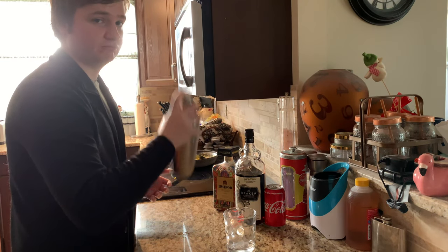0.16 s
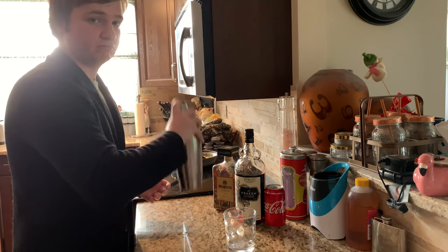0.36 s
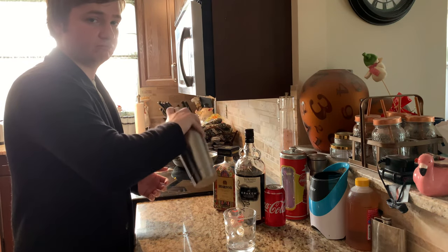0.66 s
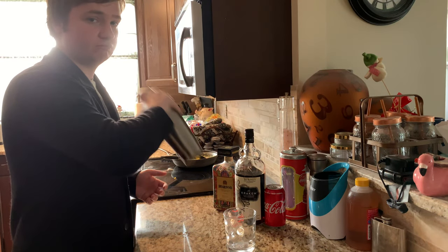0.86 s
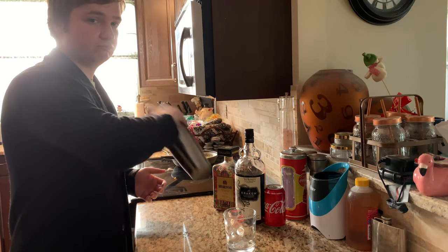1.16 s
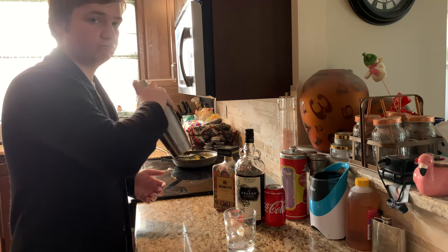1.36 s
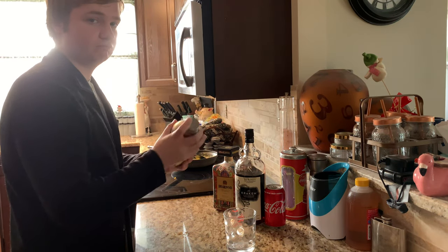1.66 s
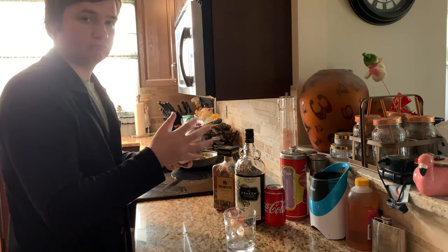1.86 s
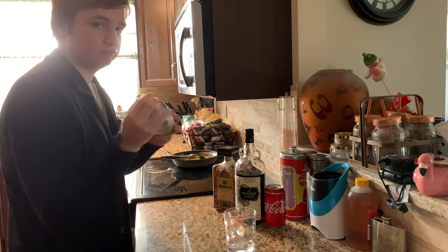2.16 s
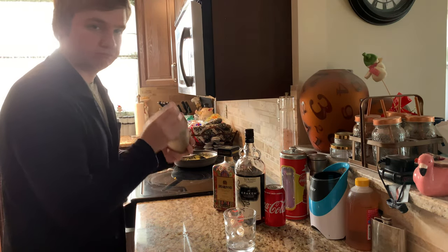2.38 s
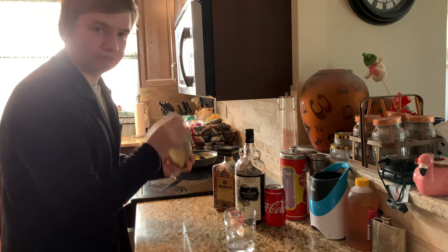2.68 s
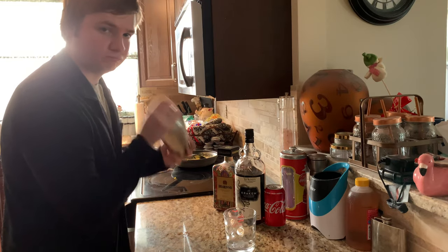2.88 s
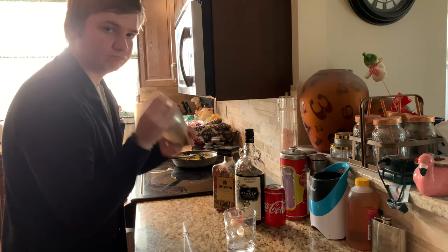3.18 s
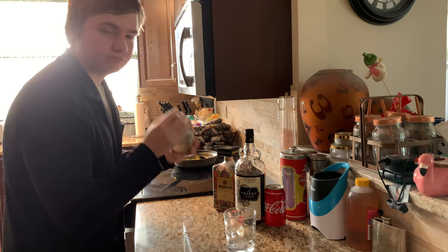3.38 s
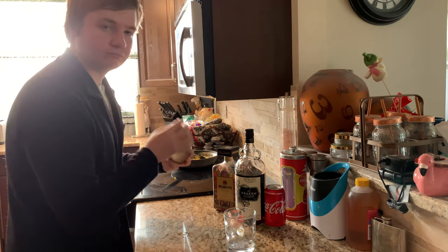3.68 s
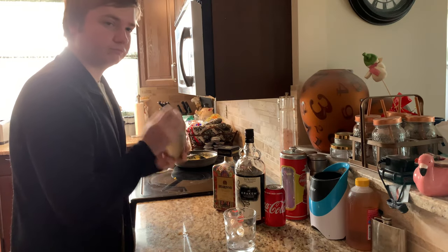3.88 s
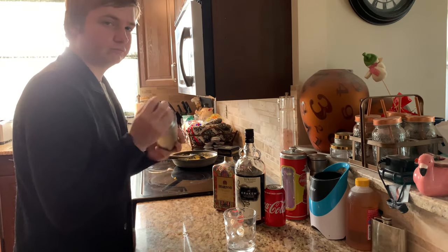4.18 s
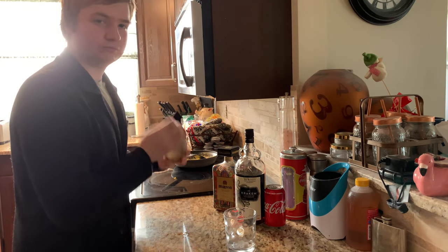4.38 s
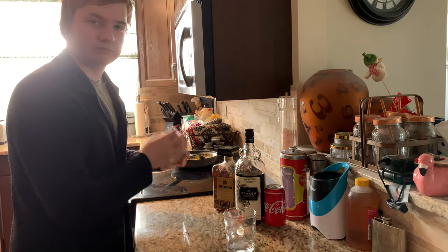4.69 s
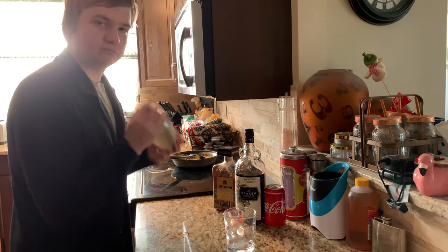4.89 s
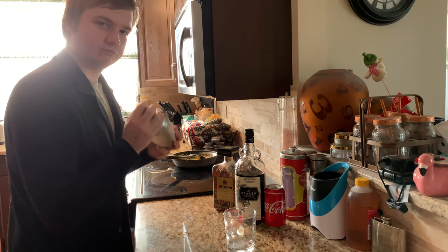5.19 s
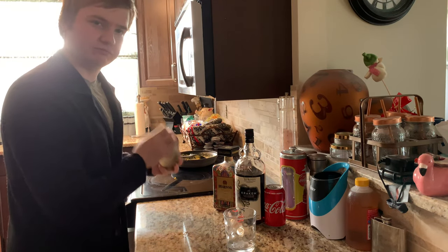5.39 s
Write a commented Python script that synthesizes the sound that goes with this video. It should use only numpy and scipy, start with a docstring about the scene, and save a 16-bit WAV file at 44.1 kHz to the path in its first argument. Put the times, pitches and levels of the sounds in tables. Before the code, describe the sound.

Close stereo capture of a metal cocktail shaker full of ice and drink in a home kitchen. Quick alternating strokes clack and rattle with hollow ringing knocks and wet slaps for under two seconds; the ice only shifts softly, then steady vigorous shaking resumes with brighter cracks and much fainter, lower knocks until the end. A low room rumble sits beneath.

```python
"""Ice and a drink are shaken hard in a steel cocktail shaker in a kitchen, with a short pause to change grip.
At each turn of the stroke the load lands in one end: whole cubes clack as short noise bursts coloured by a clink,
the rest follow as a shower of random impacts, and the liquid slaps behind them. The base knocks as gliding
damped sines, hollow and strong before the pause and faint and lower after it; modes of the steel ring along.
Diffuse reflections and a low steady rumble surround the shaker."""
import sys
import numpy as np
from scipy import signal
from scipy.fft import rfft, irfft, next_fast_len
from scipy.io import wavfile
from scipy.ndimage import uniform_filter1d, map_coordinates

SR = 44100
rng = np.random.default_rng(int(sys.argv[2]) if len(sys.argv) > 2 else 0)


def generate_wav(sig):
    """Save sig (samples, or channels by samples) to the path in sys.argv[1] as 16-bit PCM at SR."""
    pcm = np.round(np.clip(np.atleast_2d(sig).T, -1, 1) * 32767).astype(np.int16)
    wavfile.write(sys.argv[1], SR, pcm)


N = 244314
TIME = np.arange(N) / SR

# The load lands in the cap and tumbles until it is thrown back.
# Each row: start in seconds, rattle level in dB, level of the first cube in dB.
CAP_LANDINGS = [(0.1162, -24, 14.5), (0.424, -21, -5), (0.702, -28.5, 5.5), (0.994, -27.5, 7),
                (1.258, -22, 6.5), (1.508, -36.5, 3.5), (2.287, -21.5, -9), (2.642, -27, 6.5),
                (2.963, -26, 3), (3.283, -26.5, 5), (3.594, -27, 3), (3.9634, -24, 4.5),
                (4.312, -23.5, 6.5), (4.6166, -22.5, 8), (4.986, -25, 9.5), (5.32, -21.5, 6.5)]
# The load slams into the base. Each row: start in seconds, length in seconds, rattle level in dB,
# slosh level in dB, level of the first cube in dB, level of the knock in dB, pitch of the knock in Hz.
BASE_LANDINGS = [(0.002, 0.098, -29, -42, -1.5, -20, 946), (0.263, 0.036, -19.5, -30, 8.5, -4.5, 990),
                 (0.553, 0.018, -22.5, -29.5, -6, 2, 1002), (0.8416, 0.03, -25.5, -30, 12, -4, 950),
                 (1.126, 0.014, -24.5, -27.5, 8, -10, 884), (1.418, 0.015, -26, -24, 0, -12, 870),
                 (1.663, 0.082, -25.5, -32.5, -13, -6, 1004), (2.427, 0.049, -25, -31, -4, -31.5, 513),
                 (2.7893, 0.02, -24, -33.5, 6, -33.5, 500), (3.091, 0.046, -26, -33.5, -2, -37, 498),
                 (3.426, 0.022, -22, -31, -3, -23, 508), (3.7904, 0.017, -20.5, -25.5, 0, -29.5, 514),
                 (4.122, 0.029, -20, -28, 5, -26, 511), (4.447, 0.043, -24.5, -31.5, -1, -29.5, 506),
                 (4.784, 0.03, -27.5, -32.5, 4.5, -27, 499), (5.147, 0.043, -23, -34.5, 3, -30.5, 514),
                 (5.481, 0.034, -26.5, -29, 6, -27.5, 520)]
# The ice shifts gently while the grip changes.
# Each row: start in seconds, length in seconds, rattle level in dB, brightness in dB.
ICE_SHIFTS = [(1.899, 0.054, -47, -1.5), (2.086, 0.14, -42.5, 3)]
# Single cubes that stand out of the rattle.
# Each row: start in seconds, energy in dB, brightness in dB, pitch of the clink in Hz.
STANDOUT_CUBES = [(0.3811, -0.5, -2, 1630), (0.528, 6, 2.5, 3580), (0.5466, 9.5, -1, 3330),
                  (0.8056, 3.5, 3.5, 1700), (0.8571, 11, -21, 2130), (1.0036, 8, -13, 2830),
                  (1.137, 6.5, 2.5, 2450), (1.2741, 4, -24, 2800), (1.3989, 11, -4, 2570),
                  (1.4315, 9.5, -5, 3870), (1.6912, 9, -15, 1860), (1.74, 4.5, -9, 2950),
                  (1.7865, 7, -12, 3820), (1.8032, -5.5, 8, 4240), (1.84, 6, -23, 2490),
                  (1.905, -2.5, -31, 2620), (2.013, -7.5, -28, 2250), (2.1098, 8, -26, 2550),
                  (2.1795, 8, -11.5, 2230), (2.4415, 3, 3.5, 3240), (2.464, 11.5, -3.5, 3780),
                  (2.4745, 1, -15, 3700), (2.652, 4, 1, 3320), (2.7968, 9, 1, 3660),
                  (2.9868, 10, 5.5, 3100), (3.0473, 6, -20, 3900), (3.1071, 9.5, -1, 4030),
                  (3.26, -0.5, 2, 2600), (3.3081, 11.5, -4, 2780), (3.4492, 10.5, -14, 3790),
                  (3.6274, 9.5, -4.5, 2890), (3.7318, -5.5, 3.5, 3080), (3.8025, 11.5, -7, 3800),
                  (3.9867, 10, -2, 3100), (4.1514, 10.5, -12, 3940), (4.3302, 6.5, 1, 3130),
                  (4.4577, 4, 7.5, 3460), (4.6895, 5.5, -7, 4000), (5.0162, 1, 6, 3560),
                  (5.0841, -7.5, 16.5, 3820), (5.113, -1.5, 1.5, 3600), (5.158, 11, -2.5, 3120),
                  (5.3449, 8, -13, 3550), (5.3897, 13, -13, 2800), (5.4948, 5.5, 6.5, 3400)]
# Modes of the shaker wall, damped by the grip. Each row: nominal frequency in Hz,
# nominal level in dB held in one hand, the same in two hands, t60 in seconds.
TIN_MODES = [(1009.4, -17, -28, 0.2), (1444.6, -17, -17.5, 0.051), (1490, -20.5, -18.5, 0.2),
             (1699, -46, -29.5, 0.052), (1865, -15.5, -45, 0.0077), (2680, -27, -27.5, 0.2),
             (3080, -42, -22.5, 0.07), (3300, -33, -38, 0.11), (3790, -34, -27, 0.14),
             (4287, -56, -20, 0.03), (4540, -48, -21, 0.017), (6970, -33, -19.5, 0.014)]
# Relative spectrum of ice on the wall. Each row: frequency in Hz, density in dB per Hz.
BODY_SPECTRUM = [(300, -17), (800, -18.5), (1200, -13), (1550, -0.5), (2100, -2.5), (2750, 4.5),
                 (3300, -0.5), (3900, 5.5), (4700, -11.5), (5600, -12.5), (9000, -7.5)]
# Relative spectrum of the bright crack. Each row: frequency in Hz, density in dB per Hz.
CRACK_SPECTRUM = [(1500, -58), (4000, 2.5), (5200, 6), (5800, 4.5), (7000, 5), (8500, 0.5), (9600, 2.5),
                  (10500, 7.5), (11800, 0), (13500, 0), (15000, -14), (16000, -13.5)]
# Relative spectrum of the moving drink. Each row: frequency in Hz, density in dB per Hz.
SLOSH_SPECTRUM = [(100, -17), (250, -15.5), (380, -3.5), (510, -1.5), (620, 3), (850, 3), (1200, 3.5),
                  (2000, 6), (4000, -45)]
# Direct sound at the two microphone ports. Each row: frequency in Hz, phase in radians by which left leads.
PORT_PHASE = [(100, 1), (520, 0.52), (1500, 0.28), (2600, 1.5), (4900, 2), (5600, 3.5), (6800, -0.27),
              (10200, -2.5), (13300, -6), (16000, -9.5)]
# Decay of the kitchen. Each row: frequency in Hz, t60 in seconds.
KITCHEN_T60 = [(200, 1.5), (1000, 0.6), (3000, 0.63), (7000, 0.35), (15000, 1.9)]
# Strength of the kitchen. Each row: frequency in Hz, reverberation against direct sound in dB.
KITCHEN_LEVEL = [(200, -15.5), (1000, -7.5), (3000, -7.5), (7000, -6), (15000, -24.5)]
# Relative spectrum of the background. Each row: frequency in Hz, density in dB per Hz.
ROOM_TONE_SPECTRUM = [(20, -8.5), (35, -11), (55, 6.5), (78, -16), (110, -1), (160, -18), (212, -1.5),
                      (300, -13.5), (600, -21), (1500, -20), (5000, -21), (16000, -77)]

REGRIP_S = 2.0
# The base left free, then covered by a palm. Each row: rattle brightness in dB,
# delay of the knock in seconds, t60 of the knock in seconds.
ONE_HAND, TWO_HANDS = (-5, 0.00106, 0.048), (-0.35, 0.011, 0.13)
# Brightness and slosh stand against the rattle.
CAP_SAG_DB_PER_S, CAP_BRIGHT_DB, CAP_SLOSH_DB = 41.5, -5, -17.5
SHIFT_SLOSH_DB = 2.5
# The first cube of a landing clinks lower on the cap than on the base.
CAP_CLINK_HZ, CAP_CUBE_BRIGHT_DB = 2800, -5
BASE_CLINK_HZ, BASE_CUBE_BRIGHT_DB = 3800, 5   # the grip's brightness is added
# Late cubes follow every movement: time window, energy against the rattle, chance spread to either side.
STRAY_WINDOW_S, STRAY_DB, STRAY_SPREAD_DB = (0.012, 0.11), 22, 2.5
STRAY_HZ, STRAY_BRIGHT_DB = (2430, 4095), -6
KNOCK_FLAT, DRAIN_S = 0.033, 0.018   # a knock starts flat by this share and rises as the liquid runs off
AFTER_SLAP_DB, AFTER_SLAP_T60_S = 5.5, 0.11   # later waves are this much softer, and ring this long
SLAP_LOSS_DB, SLAP_RISE = 4.5, 0.018   # further loss and share of pitch rise for each wave
PORT_DIP_HZ, PORT_DIP_WIDTH_HZ, PORT_DIP_DB = 10440, 1420, -14.5
ROOM_TONE_DB = -44.5


def showers(rise_s=0.0044, fade_db_per_s=230):
    """Granular impact: landing envelopes add as power and drive the rattle of ice and the slosh of drink."""
    body, crack, wet = np.zeros((3, N))
    age = TIME[:SR // 2]
    for s, length, sag_db_per_s, db, bright_db, slosh_db in tumbles():
        rise = np.clip(age / rise_s, 0, 1)
        loss_db = sag_db_per_s * age + fade_db_per_s * np.maximum(age - length, 0)
        shape = rise * from_db(-loss_db)
        add(body, s, (shape * from_db(db)) ** 2)
        add(crack, s, (shape * from_db(db + bright_db)) ** 2)
        add(wet, s, (shape * from_db(slosh_db)) ** 2)
    cubes = collisions(BODY_SPECTRUM, np.sqrt(body), per_s=330, spread_db=2.0, t60=0.032, patchy_db=5.0)
    chips = collisions(CRACK_SPECTRUM, np.sqrt(crack), per_s=900, spread_db=1.0, t60=0.013,
                       patchy_db=4.0, spots=4)
    slosh = collisions(SLOSH_SPECTRUM, np.sqrt(wet), per_s=500, spread_db=8.5, t60=0.033,
                       patchy_db=-1.5, spots=4)
    return cubes + chips, slosh


def tumbles():
    """Inertia of the load: yields start s, length s, sag dB per s, rattle dB, brightness dB, slosh dB."""
    for s, length, db, slosh_db, *_ in BASE_LANDINGS:
        yield s, length, 0, db, grip(s)[0], slosh_db
    for s, db, _ in CAP_LANDINGS:
        thrown_back = min(row[0] for row in BASE_LANDINGS if row[0] > s)
        yield s, thrown_back - s, CAP_SAG_DB_PER_S, db, CAP_BRIGHT_DB, db + CAP_SLOSH_DB
    for s, length, db, bright_db in ICE_SHIFTS:
        yield s, length, 0, db, bright_db, db + SHIFT_SLOSH_DB


def collisions(spectrum, level, per_s, spread_db, t60, patchy_db, spots=8, full_db=-30):
    """Shot noise: uneven chance impacts share a given power among wall spots, each with its own colour."""
    rate = per_s * np.clip(level / from_db(full_db), .1, 1)   # gently moved ice only ticks now and then
    hits = rng.random(N) < rate / SR
    size_db = spread_db * np.clip(rng.standard_normal(N), -2, 2)
    energy = hits * from_db(size_db) ** 2
    # the momentum of the load is shared out: many small hits or a few large ones
    crowd = np.abs(uniform_filter1d(energy, size=1100))
    energy = level ** 2 * energy / (crowd + 1e-4)
    spot = rng.integers(0, spots, N)
    keep = from_db(-60 / (t60 * SR)) ** 2   # energy kept from sample to sample
    out = 0
    for k in range(spots):
        struck = energy * (spot == k) + 1e-18
        dying = np.sqrt(signal.lfilter([1 - keep], [1, -keep], struck))
        out = out + through(dying * two_port_noise(-2, N), impulse(spectrum, patchy_db)[None])
    return out


def clacks(clink_db=-3, clink_t60=0.012, spread=0.12, neighbour_db=-6, wall_db=-4, strike_db=-4,
           wall_per_bright=0.44):
    """Contact stiffness: a flat, wet hit is a round clink; a hard corner rattles the wall and cracks."""
    out = np.zeros((2, N))
    for s, db, bright_db, hz in cube_hits():
        below, above = 1 + spread * rng.uniform(0.9, 1.55, 2) * [-1, 1]
        neighbours = mode(hz * below, clink_t60, size=1024) + mode(hz * above, clink_t60, size=1024)
        cube = mode(hz, clink_t60, size=1024) - from_db(neighbour_db) * neighbours
        clink = contact(unit_energy(cube), t60=0.074, snap=1.25)
        add(out, s, from_db(db + clink_db) * clink)
        # the first touch is abrupt; the wall shivers on for a few hundredths of a second
        force_db = db + wall_per_bright * bright_db
        strike = contact(impulse(BODY_SPECTRUM, patchy_db=6.0), t60=0.0066, snap=0.38)
        add(out, s, from_db(force_db + strike_db) * strike)
        shiver = contact(impulse(BODY_SPECTRUM, patchy_db=3.5), t60=0.072, snap=0, size=4096)
        add(out, s, from_db(force_db + wall_db) * shiver)
        crack = contact(impulse(CRACK_SPECTRUM, patchy_db=7.0), t60=0.04, snap=0.68)
        add(out, s, from_db(db + bright_db) * crack)
    return out


def cube_hits(strays=2):
    """Discrete impacts, leading, stray and standing out: yields start s, energy dB, brightness dB, pitch Hz."""
    for s, _, cube_db in CAP_LANDINGS:
        yield s, cube_db, CAP_CUBE_BRIGHT_DB, CAP_CLINK_HZ
    for s, _, _, _, cube_db, _, _ in BASE_LANDINGS:
        yield s, cube_db, BASE_CUBE_BRIGHT_DB + grip(s)[0], BASE_CLINK_HZ
    for s, length, sag_db_per_s, db, _, _ in tumbles():
        for when, size, pitch in rng.random((strays, 3)):
            late = min(np.interp(when, [0, 1], STRAY_WINDOW_S), length * (1 + when))
            stray_db = db - sag_db_per_s * late + STRAY_DB + STRAY_SPREAD_DB * (2 * size - 1)
            yield s + late, stray_db, STRAY_BRIGHT_DB, np.interp(pitch, [0, 1], STRAY_HZ)
    yield from STANDOUT_CUBES


def contact(colour, t60, snap, apart_db=-7, size=1024):
    """Impulsive excitation: a snap and a dense, quickly dying noise pass a colour filter; unit energy."""
    burst = unit_energy(two_port_noise(apart_db, size) * from_db(-60 * TIME[:size] / t60))
    burst[:, 0] += snap
    return unit_energy(through(burst, colour[None]))


def knocks(rise_s=0.0012, slap_db=9, overtone_db=-15, under_db=-16, over_db=-14, side_t60=0.078, splash_db=6):
    """Mass loading: the drink slaps the base, whose hollow ring shifts in pitch with the liquid lying on it."""
    out, age = np.zeros((2, N)), TIME[:SR // 3]
    swell = 1 - np.exp(-(age / rise_s) ** 2)
    for s, db, hz, t60 in slaps():
        phase = 2 * np.pi * np.cumsum(hz * (1 - KNOCK_FLAT * np.exp(-age / DRAIN_S))) / SR
        note = from_db(-60 * age / t60) * np.sin(phase)
        # the other modes of the wet base, at fixed ratios to the note, have a decay of their own
        sides = from_db(under_db) * np.sin(0.8 * phase)
        sides += from_db(overtone_db) * np.sin(1.95 * phase)
        sides += from_db(over_db) * np.sin(1.2 * phase)
        sides *= from_db(-60 * age / side_t60)
        add(out, s, from_db(db) * swell * (note + sides))
        # the rest of the liquid follows unevenly, which roughens and widens the note
        width = unit_energy(np.gradient(mode(hz, t60=0.068, size=1024)))
        add(out, s + 0.00319, from_db(db + slap_db) * contact(width, t60=0.051, snap=0, size=4096))
        # and it throws ice against the base
        splash = contact(impulse(BODY_SPECTRUM), t60=0.0067, snap=0, size=2048)
        add(out, s, from_db(db + splash_db) * splash)
    return out


def slaps(count=3):
    """Dissipating waves: ever weaker slaps spread over a landing; yields start s, level dB, pitch Hz, t60 s."""
    for s, length, _, _, _, db, hz in BASE_LANDINGS:
        _, delay, t60 = grip(s)
        yield s + delay, db, hz, t60
        for k in range(1, count):
            later = s + delay + length * k / (count - 1)
            weaker_db = db - AFTER_SLAP_DB - SLAP_LOSS_DB * k
            yield later, weaker_db, hz * (1 + SLAP_RISE * k), AFTER_SLAP_T60_S


def grip(s):
    """Damping by the hands: the setting of the grip at a given time."""
    return ONE_HAND if s < REGRIP_S else TWO_HANDS


def tin_ring(load):
    """Modal resonance: the load drives the steel; the hands decide which modes ring, and each flares alone."""
    out = 0
    for hz, one_hand_db, two_hands_db, t60 in TIN_MODES:
        freedom = np.where(TIME < REGRIP_S, from_db(one_hand_db), from_db(two_hands_db))
        out = out + wetting() * through(load * freedom, mode(hz, t60)[None])
    return out


def wetting(patchy_db=4.0, count=130):
    """Variable damping: the wall rings more or less freely as the drink washes over it and leaves it."""
    knots = np.linspace(0, N, count)
    return from_db(patchy_db * np.interp(np.arange(N), knots, rng.standard_normal(count)))


def waver(x, depth, count=160):
    """Frequency modulation by a moving mass: liquid running over the wall keeps detuning it a little."""
    knots = np.linspace(0, N, count)
    detune = np.interp(np.arange(N), knots, np.gradient(rng.standard_normal(count)))
    place = np.arange(N) + depth * np.cumsum(detune)   # reading position in samples
    return np.array([map_coordinates(side, [place], order=3) for side in x])


def ports(x):
    """Interaural-style phase difference: direct sound reaches the two microphone ports out of step."""
    size = next_fast_len(N + 2048)
    phase = at_hz(PORT_PHASE, np.fft.rfftfreq(size, 1 / SR))
    return irfft(rfft(x, size) * np.exp(.5j * phase * [[1], [-1]]), size)[:, :N]


def kitchen(x, gap_s=0.0026, build_s=0.0019):
    """Diffuse reverberation: counter, cupboards and walls return noise that decays band by band."""
    age, edges = TIME[:SR // 2], np.geomspace(100, 17000, 12)
    response = 0
    for low, high in zip(edges, edges[1:]):
        hz = np.sqrt(low * high)
        band = signal.butter(2, [low, high], "band", fs=SR, output="sos")
        mid, side = signal.sosfilt(band, rng.standard_normal((2, len(age))))
        alike = 1 / (1 + (hz / 700) ** 2)   # long waves reach both ports alike
        noise = np.sqrt(1 + alike) * mid + np.sqrt(1 - alike) * side * [[1], [-1]]
        build = np.clip((age - gap_s) / build_s, 0, 1)
        shape = build * from_db(-60 * age / at_hz(KITCHEN_T60, hz))
        share = np.sqrt(2 * (high - low) / SR)   # amplitude due to the width of the band
        response = response + unit_energy(noise * shape) * share * from_db(at_hz(KITCHEN_LEVEL, hz))
    return through(x[None], response)


def room_tone(side_db=-12):
    """Stationary filtered noise: the low steady rumble of the kitchen's appliances."""
    mid, side = through(rng.standard_normal((2, N)), impulse(ROOM_TONE_SPECTRUM, size=8192)[None])
    return from_db(ROOM_TONE_DB) * (mid + from_db(side_db) * side * [[1], [-1]])


def impulse(spectrum, patchy_db=0, size=1024):
    """Minimum phase by the folded cepstrum: a unit-energy click, optionally with chance peaks and dips."""
    hz = np.fft.rfftfreq(size, 1 / SR)
    spots = np.geomspace(400, 16000, 26)
    db = at_hz(spectrum, hz) + patchy_db * np.interp(hz, spots, rng.standard_normal(len(spots)))
    cepstrum = irfft(np.log(from_db(db)))
    cepstrum[1:size // 2] *= 2
    cepstrum[size // 2 + 1:] = 0
    return unit_energy(irfft(np.exp(rfft(cepstrum))))


def mode(hz, t60, size=SR // 3):
    """Damped harmonic oscillator: a dying sine of unit energy."""
    return unit_energy(np.sin(2 * np.pi * hz * TIME[:size]) * from_db(-60 * TIME[:size] / t60))


def two_port_noise(apart_db, size):
    """Partial coherence: nearby surfaces scatter a part of white noise differently to each side."""
    common, apart = rng.standard_normal(size), rng.standard_normal((2, size))
    return (common + from_db(apart_db) * apart) / np.sqrt(1 + from_db(apart_db) ** 2)


def unit_energy(x):
    """Energy normalization: scale so that the squares sum to one."""
    return x / np.sqrt(np.sum(x ** 2, axis=-1, keepdims=True) + 1e-20)


def add(track, s, sound):
    """Superposition: mix a sound into a track at a time in seconds."""
    start = int(np.clip(s * SR, 0, N - 1))
    track[..., start:start + sound.shape[-1]] += sound[..., :N - start]


def through(x, response):
    """Linear filtering: causal convolution, cut to the length of the scene."""
    return signal.oaconvolve(x, response, axes=-1)[..., :N]


def at_hz(points, hz):
    """Interpolation along log frequency: read a table at given frequencies."""
    f, value = np.transpose(points)
    return np.interp(np.log(np.maximum(hz, 1)), np.log(f), value)


def from_db(db):
    """Logarithmic level: decibels to amplitude gain."""
    return 10 ** (np.asarray(db) / 20)


def scene():
    """Superposition of the shaker's direct sound, its reverberation and the background."""
    rattle, slosh = showers()
    load = rattle + clacks() + slosh
    ring = waver(tin_ring(load), depth=0.00898)
    shaker = load + knocks() + ring
    return ports(shaker) + kitchen(shaker.mean(axis=0)) + room_tone()


def record(dry):
    """Band rejection at the ports, soft saturation of the highest peaks and a low-pass that cuts the top."""
    band = signal.lfilter(*signal.iirpeak(PORT_DIP_HZ, PORT_DIP_HZ / PORT_DIP_WIDTH_HZ, fs=SR), dry)
    heard = dry - (1 - from_db(PORT_DIP_DB)) * band
    rounded = 1.3 * np.tanh(heard / 1.3)
    low_pass = signal.ellip(10, .2, 80, 16000, fs=SR, output="sos")   # cutoff in Hz
    return signal.sosfilt(low_pass, rounded)


dry = scene()
out = record(dry)
generate_wav(out)
```